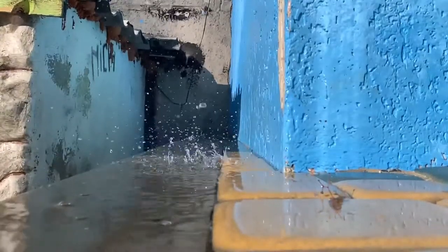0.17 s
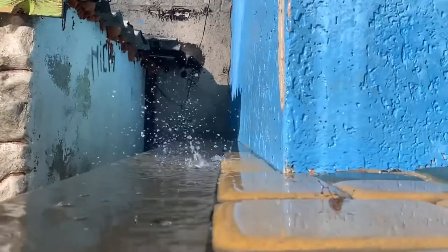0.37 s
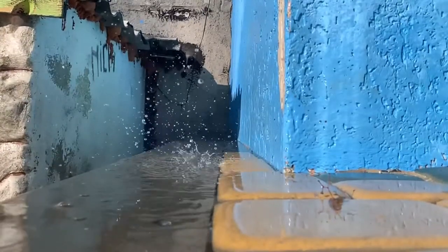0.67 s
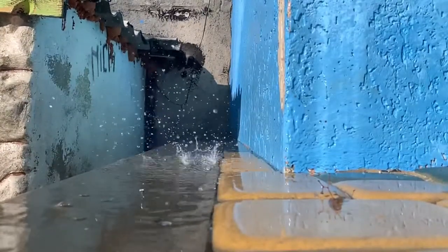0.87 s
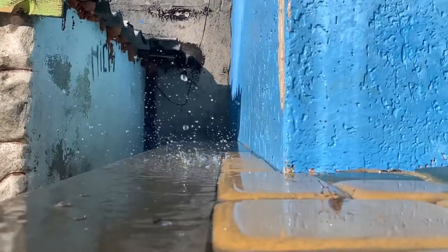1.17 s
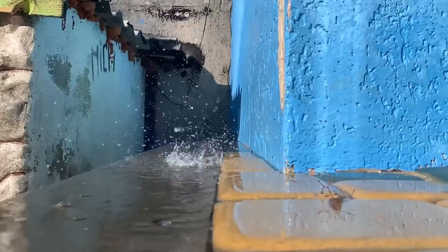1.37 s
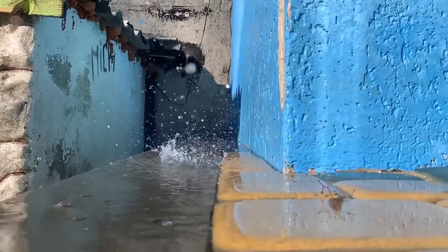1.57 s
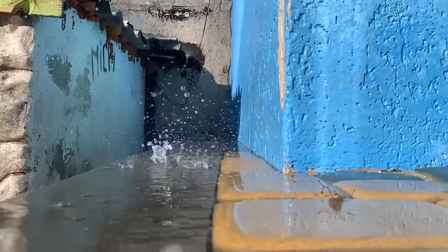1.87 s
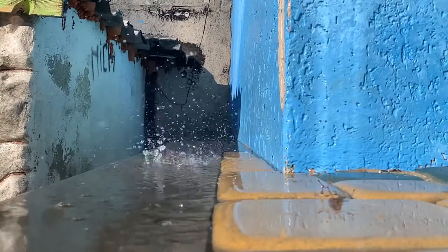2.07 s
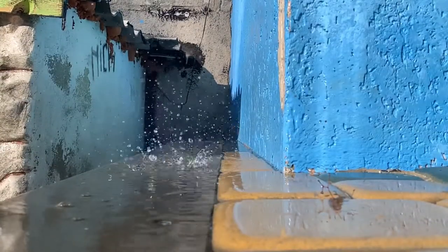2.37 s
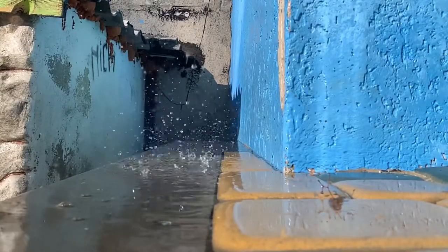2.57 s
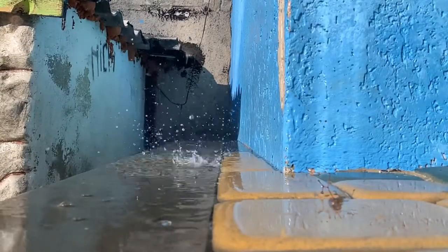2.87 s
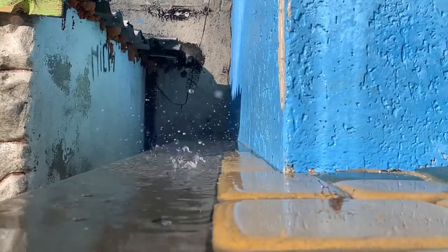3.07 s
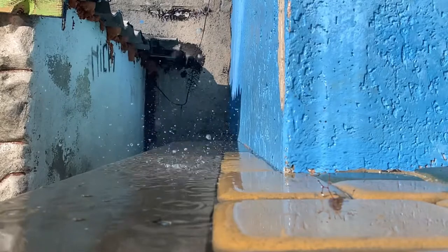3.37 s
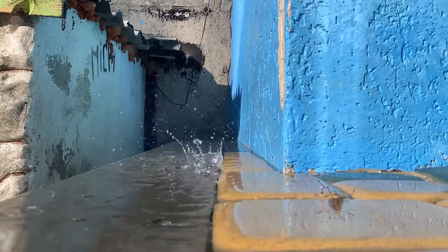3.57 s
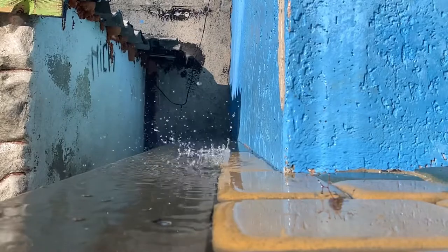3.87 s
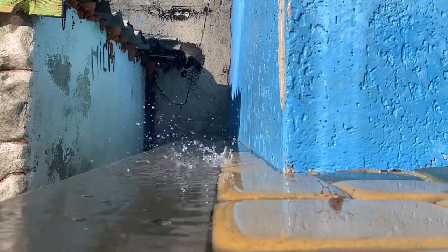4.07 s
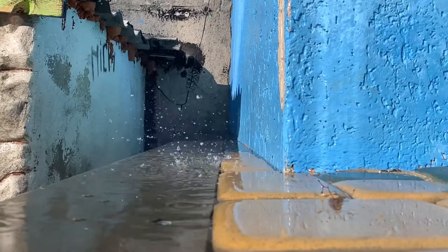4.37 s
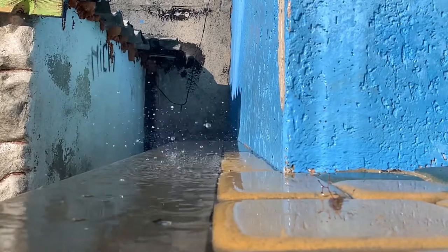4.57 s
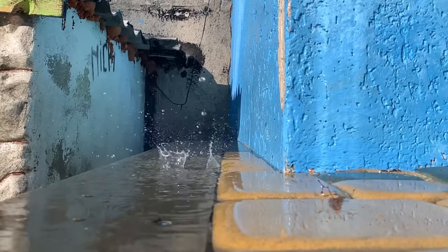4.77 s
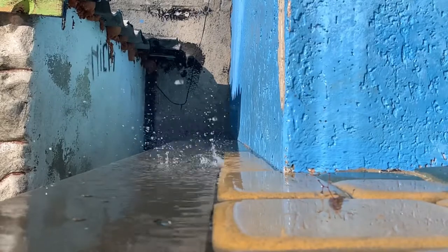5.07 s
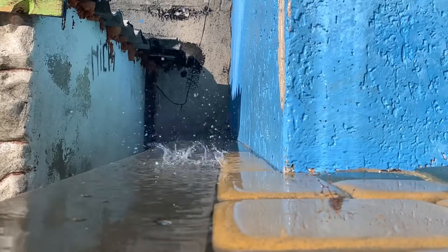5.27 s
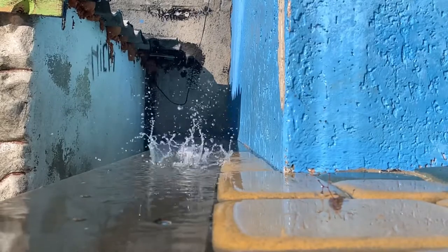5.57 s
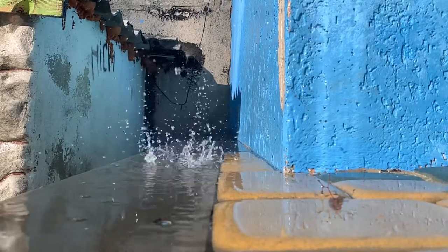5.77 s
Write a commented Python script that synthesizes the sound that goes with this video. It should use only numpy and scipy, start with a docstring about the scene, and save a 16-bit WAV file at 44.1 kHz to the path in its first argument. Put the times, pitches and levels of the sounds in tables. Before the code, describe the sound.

Slowed-down drops hit a puddle outdoors, heard in stereo from nearby. The opening is fast and crisp, then pitch and brightness fall within half a second. After that come separate dull slaps, low thumps and short bubbling plops, each with a small spray and a brief hollow ring from the narrow walls. A quieter stretch leads to a sharp slap and a final heavy double splash. Deep soft air rumble lies under everything.

```python
"""Drops strike a puddle in slow motion from the very start, over a low rumble of outdoor air and a fine patter.
Place: a concrete ledge between close walls, roof water dripping on it, two microphones.
Playback brakes in steps, so the bright spatter sinks to muffled slaps and plops.
Each drop is a burst of noise (slap and thump) with a gliding sine (its air pocket); spray is many short pings.
The walls are resonant noise, the outdoor air is coloured noise, and one faint dry tick is a decaying pulse."""
import sys
import numpy as np
from scipy import signal
from scipy.fft import rfft, irfft, next_fast_len
from scipy.io import wavfile
from scipy.ndimage import map_coordinates

SR = 44100
rng = np.random.default_rng(int(sys.argv[2]) if len(sys.argv) > 2 else 0)


def put_to_file(sound):
    """Save the sound as 16-bit audio at rate SR, in the file named by the first command-line argument."""
    columns = np.atleast_2d(sound).T  # one column per channel
    safe = np.clip(columns, -1, 1)
    whole_steps = np.round(safe * 32767)
    wavfile.write(sys.argv[1], SR, whole_steps.astype(np.int16))


N = 261513  # output samples


def amp(db):
    """Decibels to gain."""
    return 10 ** (np.asarray(db) / 20)


def unit(x):
    """x at rms 1."""
    return x / np.sqrt(np.mean(x ** 2) + 1e-20)


def along(points, hz):
    """(f/Hz, value) points read on a log frequency axis."""
    f, value = np.transpose(points)
    return np.interp(np.log(hz + 1), np.log(f + 1), value)


def filtered(x, response):
    """x times a response of frequency."""
    n = x.shape[-1]
    padded = next_fast_len(n + 4096)
    spectrum = rfft(x, padded) * response(np.fft.rfftfreq(padded, 1 / SR))
    return irfft(spectrum, padded)[..., :n]


def noise(spectrum, shape):
    """Coloured noise of rms 1."""
    return unit(filtered(rng.standard_normal(shape), lambda hz: amp(along(spectrum, hz))))


def add(track, start, sound):
    """Mix a sound into a track from a sample on."""
    part = track[..., max(start, 0):][..., :sound.shape[-1]]
    part += sound[..., :part.shape[-1]]


def swell(t, rise, fall, steep_up, steep_down):
    """A bump that peaks at t = 0 and is at half height one rise before and one fall after."""
    distance = np.abs(t) / np.where(t < 0, rise, fall)
    return .5 ** distance ** np.where(t < 0, steep_up, steep_down)


# Playback speed in steps: t/s from which it holds, speed as a multiple of the slowest.
# Pitches and durations of the sources hold at the slowest speed; landing times are output times.
PLAYBACK_SPEED = [(0, 4.75), (.068, 3.35), (.21, 2.2), (.38, 1)]


def playhead():
    """For each output sample, the position reached in the fully slowed sound."""
    starts, speeds = np.transpose(PLAYBACK_SPEED)
    step = np.searchsorted(starts, np.arange(N) / SR, side="right") - 1
    return np.cumsum(speeds[step])


def slowed_level(curve, head):
    """A curve of (t/s, level/dB) as a gain for every sample of the fully slowed sound."""
    s, db = np.transpose(curve)
    corners = np.interp(s * SR, np.arange(N), head)
    return amp(np.interp(np.arange(int(head[-1]) + 2), corners, db))


# Outdoor air, its loudness before the trims in air(): t/s, level/dB
RUMBLE_LEVEL = [(0.0, -61.5), (0.3, -60), (1.67, -59), (2.96, -62.5), (4.89, -62.5), (5.93, -58.5)]
# Outdoor air, its relative spectrum: f/Hz, level/dB
AIR_SPECTRUM = [(3, -8.5), (9, 23.5), (13, 13.5), (25, -5.5), (50, -3.5), (80, -6.5), (120, -11),
                (200, -13.5), (400, -22), (800, -29.5), (1200, -44.5), (2400, -39)]
# Outdoor air, how alike the two microphones hear it: f/Hz, left-right correlation
AIR_CORRELATION = [(20, 0.88), (60, .75), (150, 0.013), (400, -0.16), (800, -0.67), (1200, 0)]


def air(head):
    """Outdoor rumble as stereo noise, alike at both microphones in the deep bass."""
    level = slowed_level(RUMBLE_LEVEL, head)
    speed = np.interp(np.arange(len(level)), head, np.gradient(head))
    level *= amp(-2.5 * np.log2(speed))  # softer while playback is still fast

    def mid_and_side(hz):
        # half the angle whose cosine is the correlation
        turn = np.arccos(np.clip(along(AIR_CORRELATION, hz), -1, 1)) / 2
        return np.array([np.cos(turn), np.sin(turn)])

    mid, side = filtered(noise(AIR_SPECTRUM, (2, len(level))), mid_and_side)
    return amp(18.5) * level * unit(np.array([mid + side, mid - side]))


# Drops, loud and faint, each at its own moment, levels before the trims in impacts():
# landing t/s, slap level/dB, thump level/dB, air pocket f/Hz before its glide, splash length/s
TIMED_DROPS = [(.0375, -49.5, -64.5, 1900, 0.00549), (.0625, -33.5, -38.5, 1736, 0.0059),
               (.097, -47, -63, 1720, .008), (.151, -39.5, -56.5, 1087, .0035),
               (.2455, -43.5, -50.5, 1268, 0.031), (.326, -50.5, -53.5, 1700, 0.024),
               (.363, -42, -44.5, 1770, .002), (.404, -53.5, -54.5, 1350, .019),
               (.63, -52, -59.5, 1745, .04), (.867, -43.5, -48.5, 1162, 0.027),
               (.9065, -47.5, -53, 1870, .015), (.979, -50, -65, 1957, 0.028),
               (1.02, -51, -57, 1034, 0.028), (1.075, -51.5, -59, 1730, .009),
               (1.163, -56, -56.5, 1880, .005), (1.2725, -42, -52, 1900, 0.022),
               (1.3455, -46, -45.5, 1804, 0.0047), (1.37, -31.5, -33.5, 1130, .006),
               (1.378, -38.5, -38, 1860, .004), (1.4595, -42.5, -44, 1250, 0.011),
               (1.474, -42, -40, 1850, 0.019), (1.559, -52, -60.5, 1420, 0.024),
               (1.698, -55, -59, 1808, 0.037), (1.8005, -49, -54.5, 1020, 0.018),
               (1.856, -45.5, -43, 1600, 0.0027), (1.861, -35.5, -32, 1072, .003),
               (1.945, -55.5, -50.5, 710, .005), (2.033, -53, -44.5, 625, 0.0062),
               (2.055, -35, -32.5, 567, 0.0074), (2.1415, -42.5, -46.5, 1400, 0.0064),
               (2.313, -50, -54.5, 1134, 0.024), (2.465, -57.5, -60.5, 1620, 0.016),
               (2.62, -34, -28.5, 475, 0.0055), (2.631, -47.5, -36, 520, .009),
               (2.706, -67, -45.5, 403, .01), (2.722, -40, -40.5, 2080, 0.0069),
               (2.793, -51.5, -53, 1520, .005), (3.007, -52.5, -58, 1052, 0.012),
               (3.142, -52, -57, 1707, .024), (3.2385, -53.5, -62.5, 989, .019),
               (3.435, -49, -69.5, 2044, 0.0049), (3.59, -51.5, -53.5, 1840, 0.021),
               (3.6245, -38, -41.5, 1184, .014), (3.652, -54, -52, 342, 0.017),
               (3.904, -58, -59.5, 1790, 0.0035), (3.9195, -52.5, -54.5, 1116, 0.016),
               (4.031, -57, -63.5, 1720, 0.04), (4.1415, -47.5, -66, 1750, 0.0051),
               (4.33, -63, -71.5, 1930, 0.03), (4.507, -61.5, -67, 1880, .035),
               (4.659, -55, -73, 2160, .017), (4.8845, -54, -58, 1940, 0.011),
               (4.9395, -44.5, -53.5, 1900, .024), (5.1685, -28, -37, 1780, 0.0028),
               (5.231, -41, -44, 1810, 0.0049), (5.4135, -47, -45, 1267, 0.02),
               (5.576, -40.5, -23.5, 758, .0055), (5.578, -34, -30, 1142, .005),
               (5.586, -47.5, -31, 385.5, .012), (5.66, -47, -43, 361, .024), (5.691, -33, -39, 1890, .004)]
# Further light drips at random; the thump level is relative to the slap, the length is a mean
STRAY_PER_S, STRAY_DB, STRAY_SCATTER_DB, STRAY_THUMP_DB = 4, -62.5, 0.5, -4
STRAY_LOW_HZ, STRAY_HIGH_HZ, STRAY_LENGTH_S = 1015, 2040, 0.0079


def falling_drops():
    """The timed drops, then light drips at random, one in each equal share of the time."""
    count = int(STRAY_PER_S * N / SR)
    when, strength, pitch, length = rng.random((count, 4)).T
    lands_s = (np.arange(count) + when) / count * N / SR
    slap_db = STRAY_DB + STRAY_SCATTER_DB * (2 * strength - 1)
    hz = STRAY_LOW_HZ * (STRAY_HIGH_HZ / STRAY_LOW_HZ) ** pitch
    length_s = STRAY_LENGTH_S * (.5 + length)
    strays = np.transpose([lands_s, slap_db, slap_db + STRAY_THUMP_DB, hz, length_s])
    return np.vstack([TIMED_DROPS, strays])


def landings(head, drops):
    """The sample of the slowed sound at which each drop lands."""
    return np.interp(drops[:, 0] * SR, np.arange(N), head).astype(int)


ATTACK_S = 0.0016  # shortest opening of a splash


def afterglow(head, drops, db, rise, fall):
    """The summed envelope of what all the drops leave behind; a longer splash moves more water."""
    size, lead = int(head[-1]) + 2, SR // 5
    water = (ATTACK_S + drops[:, -1]) / 0.0071
    power = np.bincount(landings(head, drops), amp(db) ** 2 * water, size)
    shape = swell(np.arange(-lead, 3 * lead) / SR, rise, fall, steep_up=0.95, steep_down=0.85)
    summed = signal.fftconvolve(power, shape ** 2)[lead:lead + size]
    return np.sqrt(np.abs(summed))  # abs guards against rounding below zero


def droplets(size, per_s, scatter_db, cycles, low_hz=900, high_hz=2500):
    """Tiny droplets or bubbles come at random, each a ping of a few cycles; rms 1."""
    count = int(per_s * size / SR)
    when, pitch, weight = rng.random((count, 3)).T[..., None]
    hz = low_hz * (high_hz / low_hz) ** pitch
    k = np.arange(int(5 * cycles / low_hz * SR))
    level = amp(-scatter_db * np.log(weight + 0.019))  # a few stand far above the rest
    pings = level * np.sin(2 * np.pi * hz * k / SR) * np.exp(-hz * k / SR / cycles)
    places = (when * size).astype(int) + k
    return unit(np.bincount(places.ravel(), pings.ravel(), size)[:size])


# A steady drizzle, plus the spray of each thump (level relative to it)
DRIZZLE_DB, FALLBACK_DB, FALLBACK_RISE_S, FALLBACK_FALL_S = -70.5, -32, 0.03007, 0.054


def patter(head, drops):
    """Fine spray keeps falling back on the puddle as short pings, more of it after a heavy thump."""
    thump_db = drops[:, 2]
    fallback = afterglow(head, drops, thump_db + FALLBACK_DB, FALLBACK_RISE_S, FALLBACK_FALL_S)
    level = np.hypot(amp(DRIZZLE_DB), fallback)
    return level * droplets(len(level), per_s=900, scatter_db=4.5, cycles=1.8)


# Mean and scatter of the pitch climb, as multiples of the pocket's own pitch per second
GLIDE_PER_S, GLIDE_SCATTER_PER_S = 12, 14


def pocket(t, hz):
    """A trapped pocket of air rings, its pitch mostly climbing as it surfaces."""
    glide = GLIDE_PER_S + GLIDE_SCATTER_PER_S * rng.standard_normal()
    pitch = np.clip(hz * (1 + glide * t), 200, 2600)
    return np.sin(2 * np.pi * (np.cumsum(pitch) / SR + rng.random()))


def burst(carrier, shape):
    """The carrier under a bump, with the energy that rms 1 gives."""
    return unit(carrier * shape) * np.sqrt(np.mean(shape ** 2))


# Bright slap of water on water, relative spectrum: f/Hz, level/dB
SLAP_SPECTRUM = [(300, -42), (700, -21.5), (1000, 0), (1200, 1), (1500, 0.5), (1850, 2), (2100, 0),
                 (2400, -7)]
# Dull thump under it, relative spectrum: f/Hz, level/dB
THUMP_SPECTRUM = [(80, -16), (180, -11.5), (300, -1), (410, -1), (600, -6), (800, 1), (950, -4.5),
                  (1200, -19), (2000, -48)]
# Shares of the splash length: added to the opening, and held at the top
ATTACK_SHARE, HOLD_SHARE = 0.15, 0.42
RING_FALL_S = 0.017  # longest half-height fall of an air pocket's ring
CLEAN_S = 0.0019  # a drop this short is half ring, half noise; longer ones are mostly noisy splatter


def impacts(head, drops):
    """Every drop slaps, thumps and rings a pocket of air; returns the bright and the dull track."""
    bright, dull = np.zeros((2, int(head[-1]) + 2))
    lead = SR // 30
    t = np.arange(-lead, 4 * lead) / SR
    for start, (_, slap_db, thump_db, hz, length) in zip(landings(head, drops), drops):
        attack, hold = ATTACK_S + ATTACK_SHARE * length, HOLD_SHARE * length
        fall = max(length - hold, .001)
        off_top = t - np.clip(t, 0, hold)  # zero while the top is held
        shape = swell(off_top, attack, fall, steep_up=2.6, steep_down=1.1)
        slap = burst(noise(SLAP_SPECTRUM, t.shape), shape)
        thump = burst(noise(THUMP_SPECTRUM, t.shape), shape)
        ring_fall = min(1.3 * fall, RING_FALL_S)
        ring_shape = swell(off_top, 1.2 * attack, ring_fall, steep_up=4.8, steep_down=1.4)
        ring = burst(pocket(t, hz), ring_shape)
        clean = CLEAN_S / (CLEAN_S + length)
        # small pockets ring with the slap, large ones with the thump
        if hz > 950:
            slap = np.sqrt(1 - clean) * slap + np.sqrt(clean) * ring
        else:
            thump = np.sqrt(1 - clean) * thump + amp(5) * np.sqrt(clean) * ring
        add(bright, start - lead, amp(slap_db + 4.5) * slap)
        add(dull, start - lead, amp(thump_db - 2) * thump)
    return bright, dull


def crown(head, drops, size):
    """The crown tears and collapses as bright noise, then its spray comes down as pings."""
    slap_db = drops[:, 1]
    collapse = afterglow(head, drops, slap_db - 13, rise=0.003, fall=0.048) * noise(SLAP_SPECTRUM, size)
    spray = afterglow(head, drops, slap_db - 18.0, rise=0.00095, fall=0.048)
    return collapse + spray * droplets(size, per_s=280, scatter_db=6.5, cycles=0.98)


# Dull wash after a thump, relative spectrum: f/Hz, level/dB
WASH_SPECTRUM = [(100, -17.5), (200, -8), (330, 0.5), (450, -1.5), (600, 1), (800, -3), (950, -12),
                 (1200, -30), (2000, -46)]


def dull_wash(head, drops, size):
    """A brief dull noise follows each thump."""
    return afterglow(head, drops, drops[:, 2] - 13.5, rise=0.00097, fall=0.009) * noise(WASH_SPECTRUM, size)


def gurgle(head, drops, size):
    """Larger bubbles gurgle in the cavity: lower pings that ring for more cycles."""
    level = afterglow(head, drops, drops[:, 2] - 17.5, rise=.002, fall=0.036)
    return level * droplets(size, per_s=110, scatter_db=4, cycles=6.3, low_hz=410, high_hz=830)


# Hollow colour of the soft swell around each thump, relative spectrum: f/Hz, level/dB
HOLLOW_SPECTRUM = [(250, -30.5), (420, -6), (600, -2.5), (820, 1.5), (950, -2.5), (1100, -30), (2000, -60)]


def hollow_swell(head, drops, size):
    """A soft hollow noise leads into each thump and fades after it."""
    return afterglow(head, drops, drops[:, 2] - 19, rise=.026, fall=0.013) * noise(HOLLOW_SPECTRUM, size)


# Resonances of the gap between the walls: f/Hz, width/Hz, relative level/dB
WALL_MODES = [(348.7, 4.5, 6), (401, 23, 0), (476, 18, -1.5), (578.6, 27, -6.5), (775, 20, -11),
              (888, 13, -16)]


def alcove(size):
    """Stereo noise of rms 1 in the resonances of the gap between the walls."""
    def response(f):
        modes = sum(amp(db) * 1j * f * width / (centre * centre - f * f + 1j * f * width)
                    for centre, width, db in WALL_MODES)
        return modes * amp(along(HOLLOW_SPECTRUM, f))
    return unit(filtered(rng.standard_normal((2, size)), response))


def splashes(head, drops):
    """Impacts and what they leave behind; returns the bright, the dull and the diffuse sound."""
    bright, dull = impacts(head, drops)
    size = len(bright)
    bright += crown(head, drops, size)
    dull += dull_wash(head, drops, size)
    dull += gurgle(head, drops, size)
    dull += hollow_swell(head, drops, size)
    # the walls ring on, heard from all sides
    diffuse = afterglow(head, drops, drops[:, 2] - 21, rise=0.0016, fall=0.071) * alcove(size)
    return bright, dull, diffuse


LEFT_LAG_S = .00171  # bright sound reaches the left microphone later, in slowed time
# Phase of the dull sound between the microphones: f/Hz, lead of the left/rad
DULL_PHASE = [(60, 2.5), (250, 1.71), (430, 2), (600, 3.5), (780, 4), (950, 3.5), (1160, -2)]
# Balance of the dull sound between the microphones: f/Hz, right over left level/dB
DULL_BALANCE = [(150, -1.5), (400, 4), (650, 7.5), (850, 5), (1000, -1)]


def microphones(bright, dull):
    """Slaps arrive later on the left; thumps are mostly louder on the right and far apart in phase."""
    def lean(hz):
        return amp(along(DULL_BALANCE, hz) / 2)  # half the difference on each side

    left = filtered(bright, lambda hz: np.exp(-2j * np.pi * hz * LEFT_LAG_S))
    left += filtered(dull, lambda hz: np.exp(1j * along(DULL_PHASE, hz)) / lean(hz))
    right = bright + filtered(dull, lean)
    return np.array([left, right])


def dry_tick():
    """One faint dry tick: a pulse that dies at once, untouched by the slowing."""
    return amp(-44.0) * np.exp(-np.arange(SR // 100) / SR / 0.00068)


# Top edge of the fully slowed band: f/Hz, level/dB
SLOWED_BAND_EDGE = [(2330, 0), (2430, -7), (2520, -30.5), (2800, -38.5), (3500, -46.5), (5000, -49.5),
                    (8000, -80.5)]


def scene():
    """The slowed splashes, read at the playback speed: pitch and bandwidth fall together."""
    head = playhead()
    drops = falling_drops()
    bright, dull, diffuse = splashes(head, drops)
    pair = microphones(bright + patter(head, drops), dull) + diffuse + air(head)
    slowed = filtered(pair, lambda hz: amp(along(SLOWED_BAND_EDGE, hz)))
    out = np.array([map_coordinates(channel, [head], order=3) for channel in slowed])
    add(out, round(3.4233 * SR), dry_tick())
    return out


TOP_HZ = 11950


def record(dry):
    """Nothing is kept above the band limit."""
    return filtered(dry, lambda hz: hz < TOP_HZ)


dry = scene()
out = record(dry)
put_to_file(out)
```